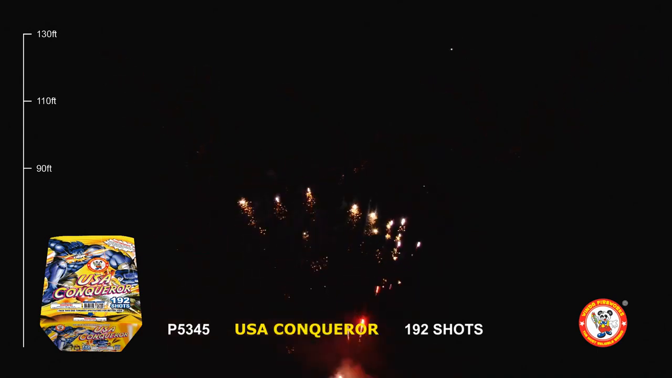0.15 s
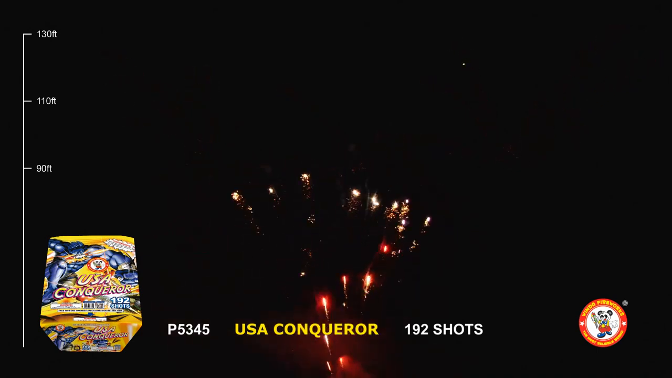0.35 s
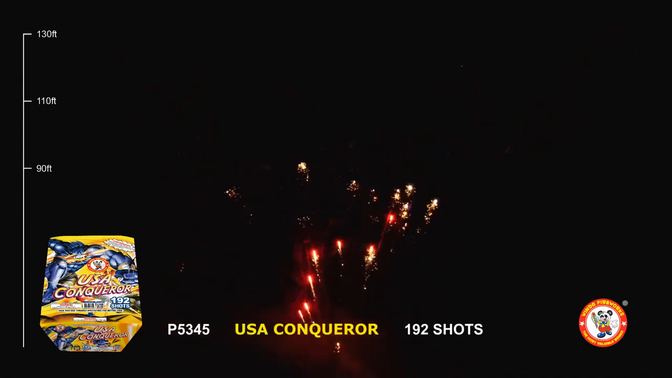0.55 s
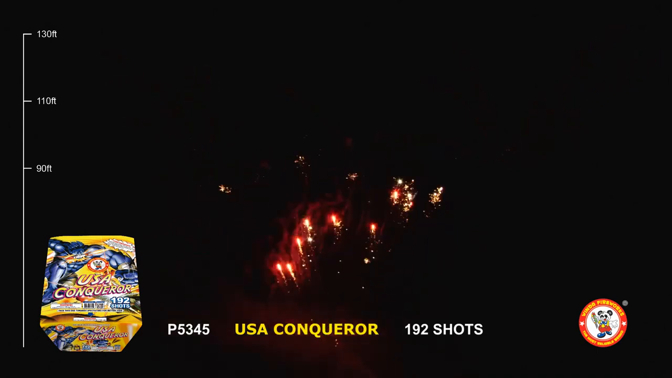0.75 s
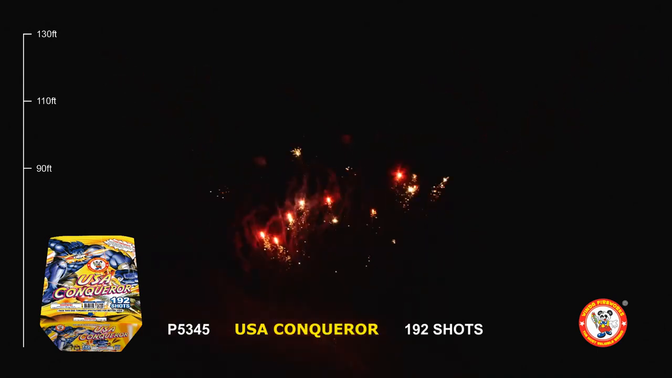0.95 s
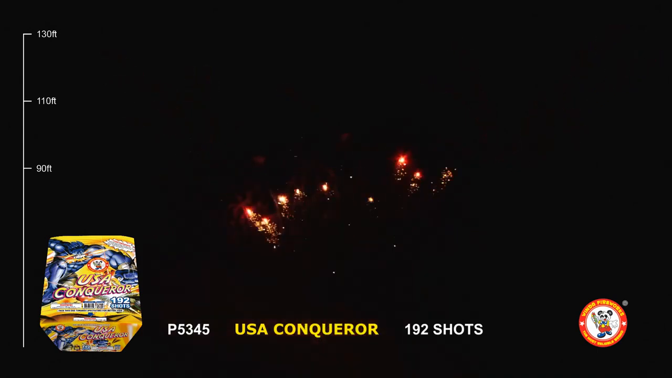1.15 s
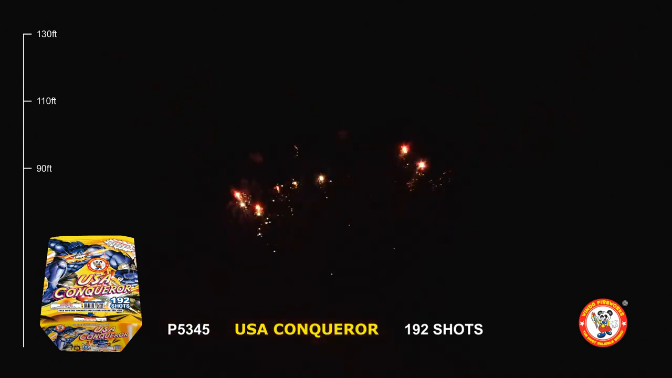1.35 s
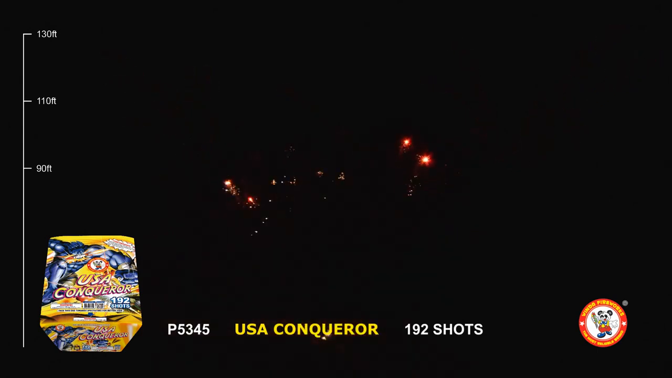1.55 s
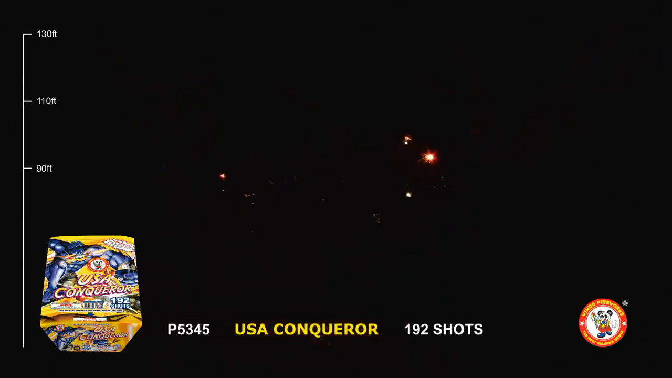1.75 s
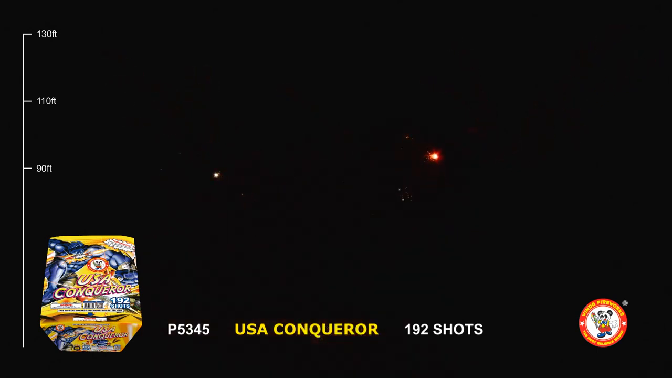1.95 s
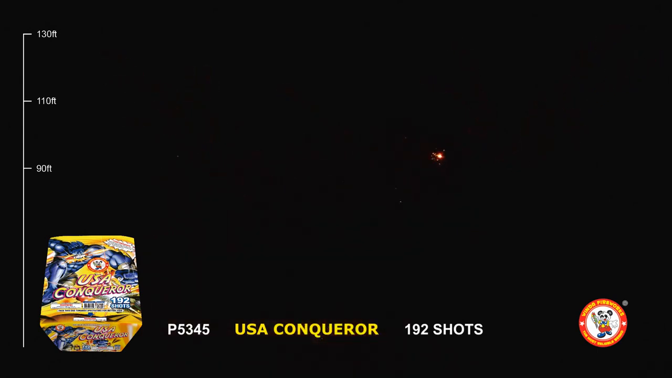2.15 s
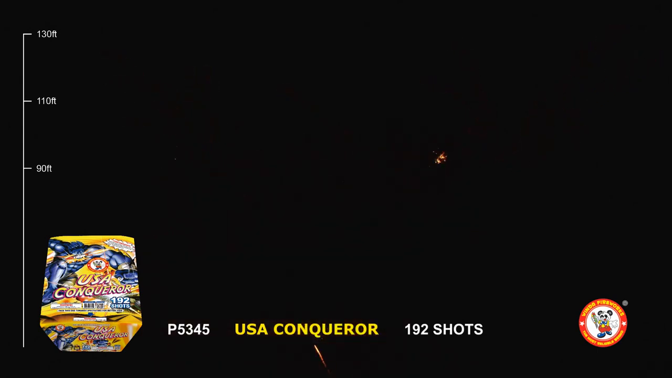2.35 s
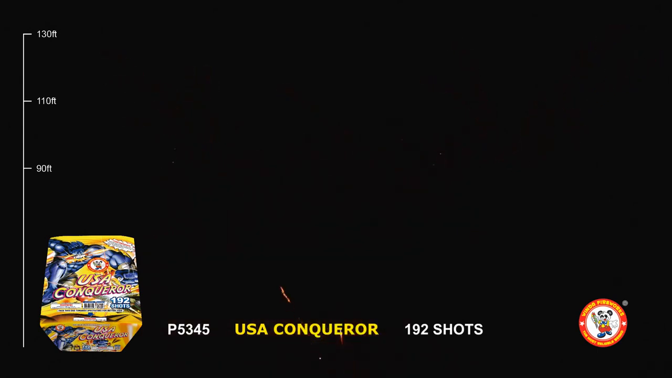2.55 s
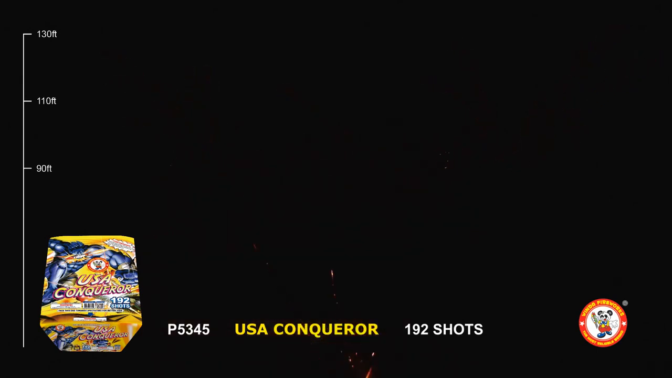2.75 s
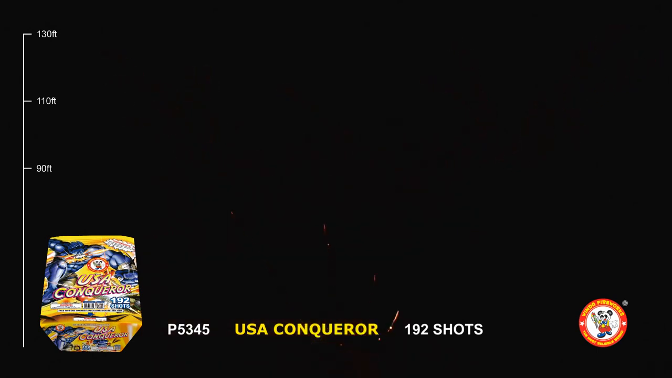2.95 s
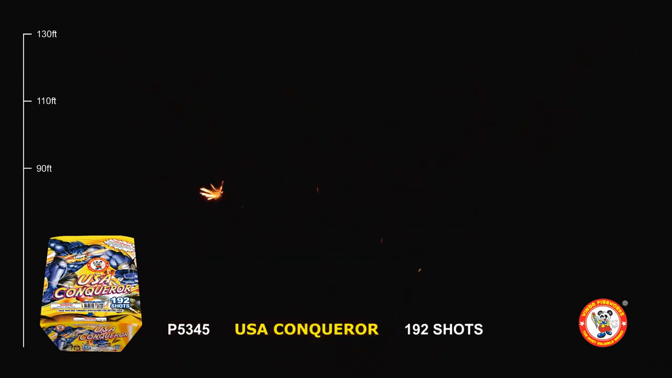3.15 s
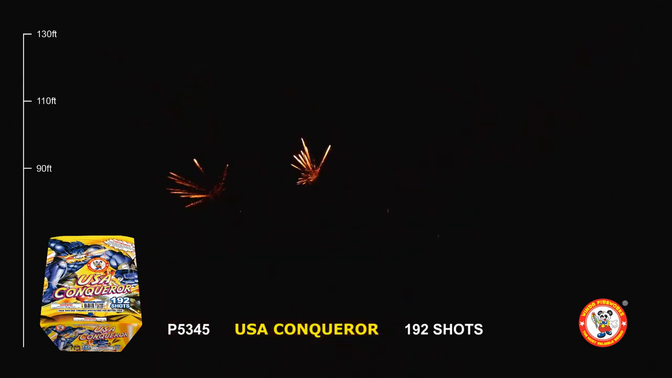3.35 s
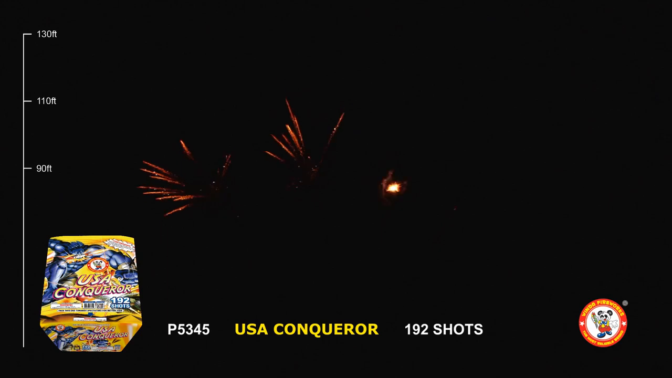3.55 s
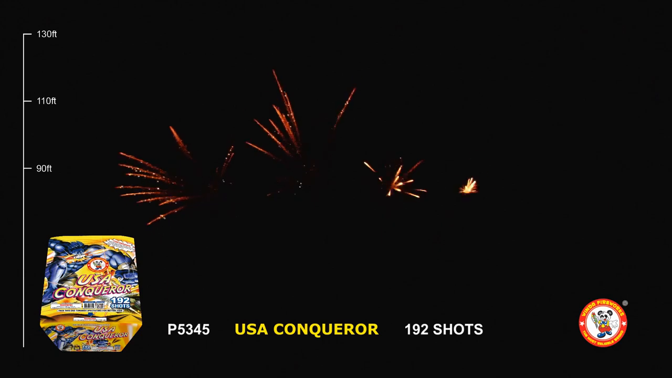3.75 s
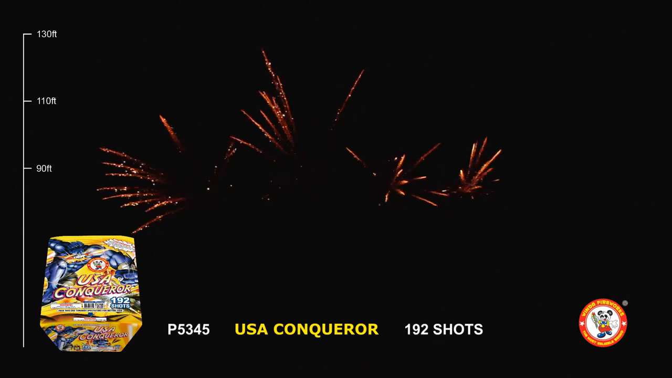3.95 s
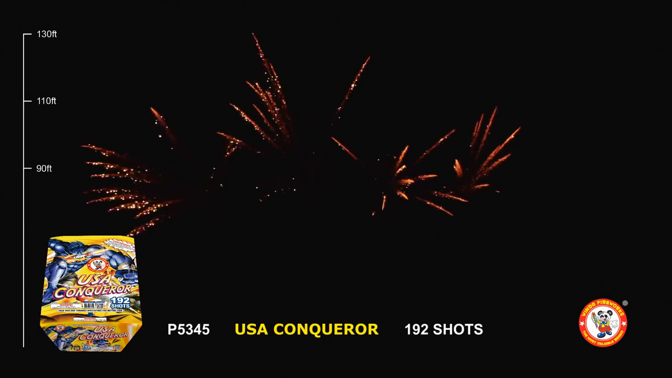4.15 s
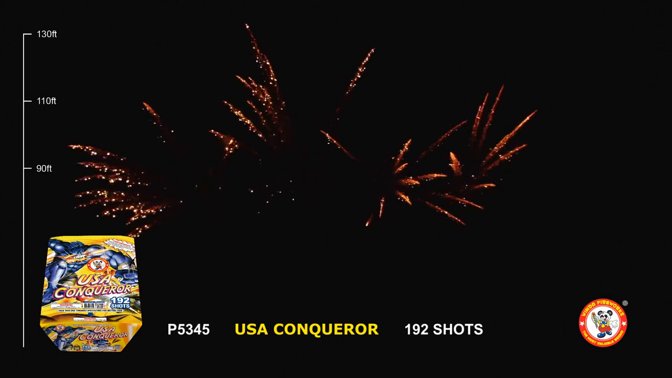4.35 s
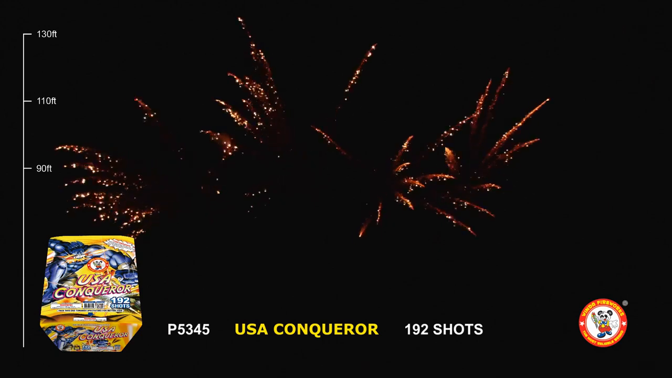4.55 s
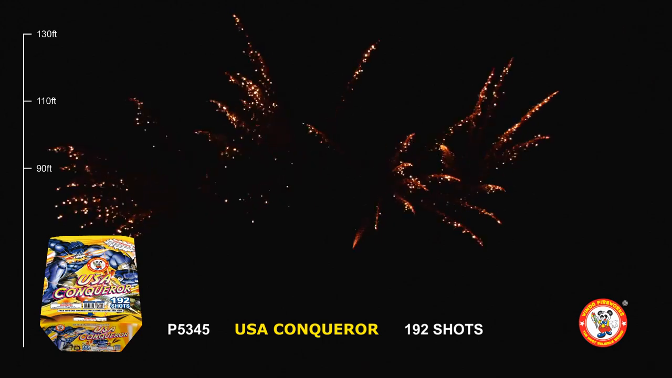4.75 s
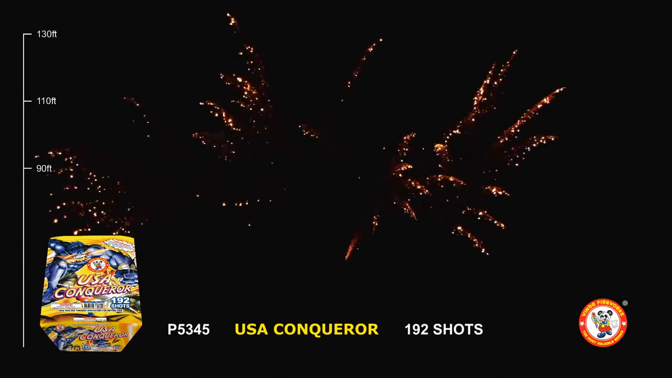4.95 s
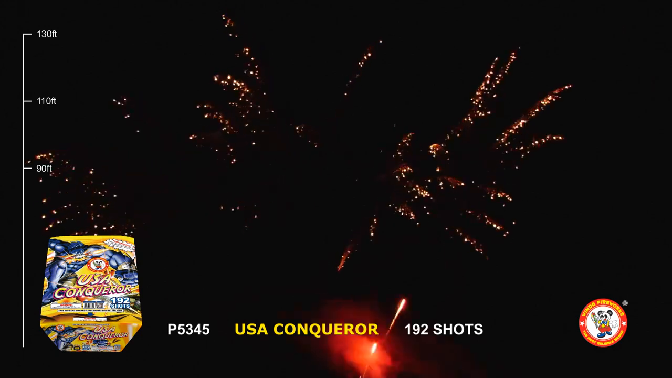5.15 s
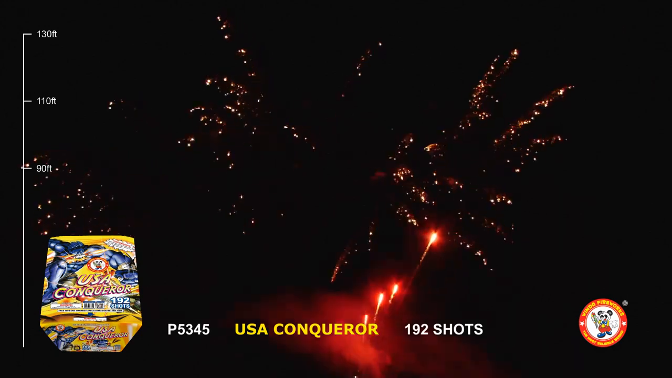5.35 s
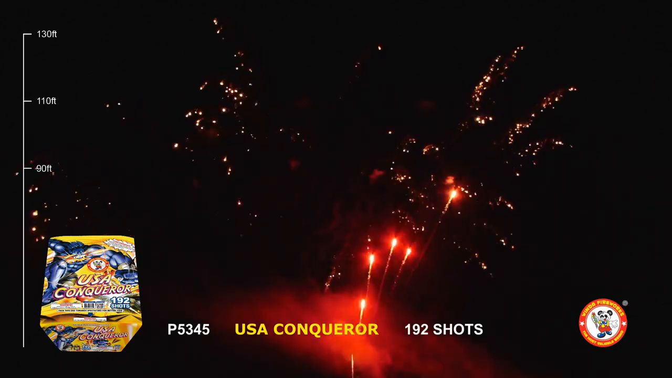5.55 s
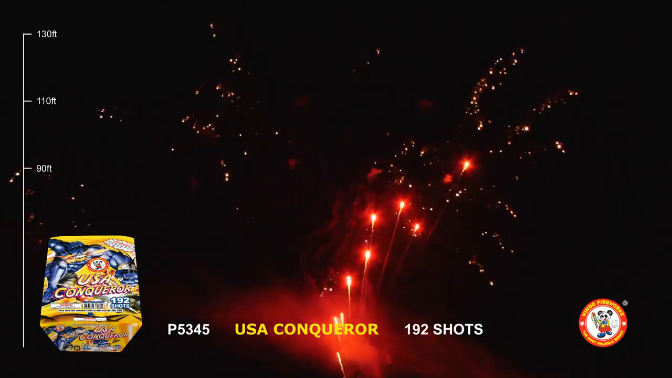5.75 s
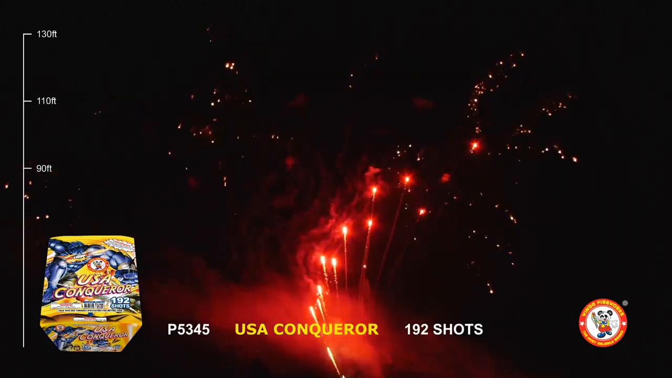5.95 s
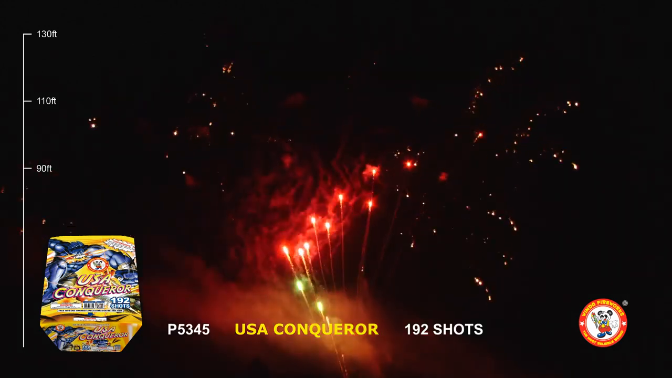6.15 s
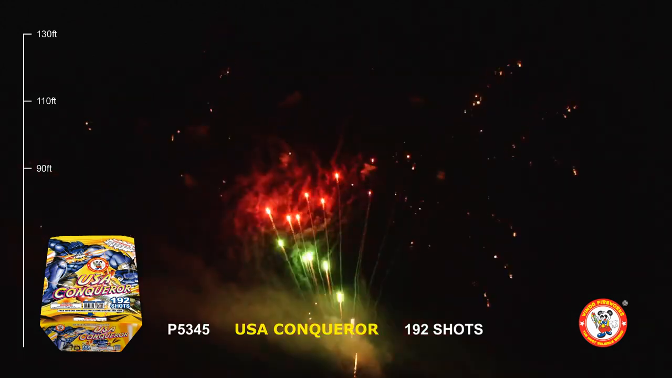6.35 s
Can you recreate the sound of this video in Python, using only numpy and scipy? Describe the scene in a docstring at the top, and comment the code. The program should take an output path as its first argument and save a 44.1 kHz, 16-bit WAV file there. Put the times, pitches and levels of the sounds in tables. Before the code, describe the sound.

A firework cake in an open field at night: rapid soft launch thumps with spits of gas under dense, sharp crackling that burns out after two seconds. Four stronger separate launches follow, then four very loud, short shell booms that overload the microphone, in two pairs. Echoes slap back from a distant wall and roll over the land before a faint glitter hiss and a final quick volley.

```python
"""Quick thumps and spits of gas come first, amid a dense crackle that burns out after about two seconds.
A firework cake fires from its tubes in an open field at night: each shot is a short push of air and a jet
of noise, each star a sharp pulse. Four more shots follow, then four shell bursts (short booms with torn
noise) that overload the microphone, a faint glitter and a last quick volley. A distant wall returns every
shot a fifth of a second later, and the bursts roll away over the land in long tails of noise."""
import sys
import numpy as np
from scipy import signal
from scipy.io import wavfile
from scipy.ndimage import uniform_filter1d

SR = 44100
rng = np.random.default_rng(int(sys.argv[2]) if len(sys.argv) > 2 else 0)


def dump(signal):
    """Clip the signal to [-1, 1] and save it as 16-bit WAV at the path in sys.argv[1]."""
    limited = np.clip(np.atleast_2d(signal).T, -1, 1)
    pcm = np.round(limited * 32767).astype(np.int16)
    wavfile.write(sys.argv[1], SR, pcm)


N = 286209  # samples in the scene
AGE = np.arange(4096) / SR  # seconds since a short sound began

# In all tables of events, the levels are starting points: the functions add their own trims in dB.
# Tube shots, one row each: (t/s, thump level/dB, gas level/dB, jet length/s, gas colour f/Hz, spit level/dB,
# first slap level/dB, second slap level/dB, wall echo against the usual level/dB, bark level/dB, bark f/Hz)
LAUNCHES = [(0.001, -36.5, -23.5, 0.002, 3130, -40, -46, -48, 4, -46, 410),
            (0.09, -33, -23, 0.0015, 1800, -39, -48, -48, 0, -36, 525),
            (0.1624, -34, -22.5, 0.0015, 1800, -49, -54, -54, 0, -39, 567),
            (0.2123, -32.5, -22.5, 0.0016, 7000, -31, -39, -37, -2, -38, 580),
            (0.303, -35, -37, 0.0023, 1790, -44, -51, -51, 1, -51, 716),
            (0.362, -36, -28, 0.002, 1800, -32, -40, -43, 5, -53, 724),
            (0.439, -33.5, -24, 0.0018, 2380, -37, -40, -40, 2, -48, 370),
            (0.511, -32.5, -27, 0.0015, 1800, -30, -36.5, -36.5, 0, -51, 390),
            (0.6134, -30.5, -21, 0.0021, 3220, -29, -28, -34, 2, -52, 400),
            (0.653, -37.5, -29, 0.0016, 2350, -24, -31, -35, 7, -55, 714),
            (0.7214, -32.5, -28, 0.002, 5900, -29, -37, -28, 1.5, -51, 373),
            (2.6208, -25.5, -18.5, 0.0018, 2085, -21.5, -28, -18, 1.5, -35, 449.5),
            (2.778, -26.5, -16.5, 0.0014, 2333, -28, -25, -21, 1.5, -39, 380),
            (2.9343, -23, -15, 0.0043, 1600, -22, -17.5, -37, 1.5, -37, 373),
            (3.0702, -28, -17.5, 0.0008, 5530, -31, -29, -29.5, 1.5, -26, 544),
            (5.3861, -31.5, -13.5, 0.0023, 5130, -32, -32, -39.0, 1.5, -33, 555),
            (5.449, -41, -20, 0.0015, 3380, -38, -29, -48, 5, -51, 660),
            (5.5357, -36, -21.5, 0.0019, 4100, -37.5, -38.5, -49, 1.5, -42, 720),
            (5.5907, -35, -22.5, 0.0027, 1600, -43, -32, -52, 1, -39, 578),
            (5.7358, -35, -24, 0.0025, 6430, -38, -31.5, -50, 1, -48, 610),
            (5.8982, -32.5, -24, 0.0012, 1900, -38.5, -35.5, -50, 2, -48, 568),
            (5.9747, -33.5, -24, 0.0012, 2320, -35.5, -32, -42.0, -1.5, -45, 370),
            (6.0119, -35.5, -22, 0.0033, 5450, -29, -30, -31.5, 4, -53, 370),
            (6.0836, -34.5, -24.5, 0.0029, 3750, -33, -28, -29, -1, -47, 380),
            (6.1417, -33, -31, 0.0019, 1600, -33, -26, -32.0, 0, -49, 460),
            (6.1929, -33, -24.5, 0.003, 1770, -29.5, -29, -26, 0, -48, 460),
            (6.2743, -37.5, -25, 0.0035, 3330, -27.5, -23.5, -24, 1, -55, 720),
            (6.3363, -36, -29, 0.003, 3600, -32, -31, -28.5, 6, -51, 730),
            (6.4135, -34, -27, 0.0029, 1880, -30, -27, -32.0, 0, -55, 494),
            (6.4876, -39, -27, 0.0018, 2350, -31, -36, -34, 3, -37, 373)]
# Ringing of the air in the tube and of the cake's box: (f/Hz, gain, time to fall to 37 percent t/s)
CAKE_MODES = [(460, 0.0022, 0.015), (181, 0.00072, 0.031)]
# Things round the cake that reflect the thump, varied at each shot: (typical delay t/s, typical gain)
NEARBY = [(.0037, -0.062), (.0085, 0.17), (0.0097, 0.26), (0.013, 0.19), (0.0178, 0.19), (.0225, -0.014),
          (0.0263, 0.085)]
# Colour of the push of air: (f/Hz, level/dB)
THUMP = [(20, -26), (60, -10), (105, -4.5), (175, 3.5), (320, -0.5), (480, 0.5), (700, -9), (1200, -7.5),
         (4000, -56)]
# Colour of the low rumble after it: (f/Hz, level/dB)
RUMBLE = [(20, -25), (60, -13), (100, 4), (150, -2), (210, 7.5), (320, -6.5), (600, -14), (2000, -50)]


def thumps(nearby_edge_hz=420, nearby_gain=1.0, thump_db=-1.0, bark_trim_db=-2, rumble_db=-10):
    """The lift charge pushes air out of a tube that barks; the cake rings, nearby things answer in the bass."""
    ring = sum(gain * np.cos(2 * np.pi * hz * AGE) * np.exp(-AGE / decay) for hz, gain, decay in CAKE_MODES)
    push = unit(colour(signal.unit_impulse(len(AGE)) + ring, THUMP))
    out = np.zeros(N)
    for s, db, *_, bark_db, tube_hz in LAUNCHES:
        shot = push.copy()
        for delay, gain in NEARBY:
            varied_delay = delay * rng.uniform(0.88, 1.12)
            varied_gain = nearby_gain * gain * rng.normal(1, 0.25)
            add(shot, varied_delay, varied_gain * dull(push, nearby_edge_hz))
        add(out, s, sized(shot, db + thump_db, 0.013))
        bark = np.sin(2 * np.pi * tube_hz * AGE) * np.exp(-AGE / 0.0056)
        add(out, s, sized(bark, bark_db + bark_trim_db, 0.013))
        rumble = colour(puff(0.0068, 0.037), RUMBLE)
        add(out, s, sized(rumble, db + rumble_db, 0.023))
    return out


# Colour of the gas: (f/Hz, level/dB)
GAS = [(200, -45.5), (700, -4), (1400, -4.5), (2000, -5.5), (2900, -0.5), (3500, -4.5), (4300, 5.5),
       (4900, -2), (5600, 1), (7000, 0), (9000, -11), (11500, -11), (13000, -32), (15500, -50)]
# Delays of the two slaps from hard things near the cake: (first t/s, second t/s)
SLAP_S = (.011, .021)
# Faces of the distant wall, used again by wall_echoes: (delay t/s, level/dB)
WALL_FACES = [(0.2096, -1.5), (0.222, -6), (0.244, -10.5), (0.2535, -13)]


def gas(jet_db=1, spit_db=0, slap_db=-1, slap_length=0.0018, mirror_db=-10, front_db=-6, colour_strength=1.6):
    """A shock and a jet at each muzzle, then spitting sparks; near things slap back, the wall mirrors the jet."""
    out = np.zeros(N)
    for s, _, jet, length, gas_hz, spit, first, second, wall_db, *_ in LAUNCHES:
        rush = amp(front_db) * shock() + gust(length) + amp(-7.5) * puff(0.0013, 0.0051, grain_db=4.5)
        blow = sized(resonate(rush, gas_hz, colour_strength, sharpness=2.7), jet + jet_db, 0.0021)
        add(out, s, blow)
        fizz = tint(spitting(), 2040, 6600, strength=1.3, sharpness=16)
        add(out, s + 0.0056, sized(fizz, spit + spit_db, 0.01))
        for delay, db in zip(SLAP_S, (first, second)):
            slap = tint(gust(slap_length), 2040, 5450, strength=1.1)
            add(out, s + delay, sized(slap, db + slap_db, 0.0048))
        for delay, face_db in WALL_FACES:
            mirrored = dull(blow, 3560, order=2)
            add(out, s + delay, amp(mirror_db + face_db + wall_db) * mirrored)
    return colour(out, GAS)


def spitting(sparks_db=-2, count=4):
    """The fizz behind a rising shell: a swell of noise with a few distinct sparks in it."""
    fizz = puff(0.0017, 0.015, grain_db=4.5)
    for delay, size in zip(rng.uniform(0.0017, .024, count), rng.uniform(0.1, 1, count)):
        spark = size * np.exp(-delay / 0.012) * puff(.0001, 0.0014)
        add(fizz, delay, amp(sparks_db) * spark)
    return fizz


# The loudest stars: (t/s, level/dB, how long the star goes on breaking up t/s, colour f/Hz)
CRACKS = [(0.0318, -25, 0.012, 1650), (0.0638, -33, 0.0013, 2500), (0.0989, -21.5, 0.00055, 2050),
          (0.137, -27.5, 0.0017, 895), (0.152, -25, 0.0023, 4090), (0.169, -26, 0.0, 5790),
          (0.217, -27, 0.01, 7500), (0.247, -25.5, 0.0, 886), (0.291, -32, 0.0, 5000),
          (0.36, -22.5, 0.01, 2160), (0.3878, -29, 0.0047, 3000), (0.394, -24, 0.0, 7450),
          (0.399, -27, 0.0057, 2000), (0.408, -22.5, 0.0021, 895), (0.4222, -27, 0, 1598),
          (0.4597, -29, 0.0015, 4430), (0.471, -26, 0.0012, 7610), (0.4923, -21, 0, 1130),
          (0.5213, -26, 0.0, 2400), (0.527, -25, 0.00014, 7500), (0.5346, -25.5, 0.00057, 5000),
          (0.5415, -28, 0.004, 1960), (0.5687, -30, 0.0, 3000), (0.5761, -23.5, 0.00015, 7500),
          (0.598, -27, 0.0049, 1508), (0.607, -28, 0.02, 1900), (0.627, -28, 0.0, 2400),
          (0.6475, -24, 0.0, 1178), (0.6674, -25.5, 0.0021, 2335), (0.7161, -27, 0.0, 2393),
          (0.734, -22, 0.0017, 5080), (0.7409, -28, 0.0, 1499), (0.7494, -19.5, 0.0, 900),
          (0.7628, -21.5, 0.00076, 895), (0.826, -23.5, 0.0, 1400), (0.8488, -24.5, 0.0011, 7540),
          (0.858, -24.5, 0.0025, 899), (0.8687, -27, 0.0, 2598), (0.9089, -20.5, 0.0044, 977),
          (0.9373, -30, 0.0038, 2310), (0.9834, -27.5, 0.0055, 888), (1.001, -29.5, 0.0, 2870),
          (1.0148, -28, 0.00043, 6040), (1.0261, -27.5, 0.0014, 1388), (1.0479, -27, 0.0034, 1014),
          (1.0849, -20.5, 0.0019, 1390), (1.0961, -25, 0.0031, 956), (1.107, -25, 0.0057, 4683),
          (1.1171, -30, 0.00038, 5030), (1.1237, -30, 0.0, 2398), (1.133, -22.5, 0.00093, 910),
          (1.1478, -27, 0.0034, 6000), (1.1571, -27.5, 0.0016, 4306), (1.2108, -26, 0.0, 2082),
          (1.2227, -30, 0.0, 5290), (1.239, -24.5, 0.013, 4410), (1.26, -33, 0.0, 5520),
          (1.2877, -23, 0.0, 2448), (1.314, -21.5, 0, 1071), (1.3241, -29, 0.0, 903),
          (1.3345, -29, 0.00067, 916), (1.3591, -26, 0.00027, 2225), (1.3667, -25, 0.0, 7450),
          (1.373, -27.5, 0, 920), (1.4208, -27.5, 0.006, 1444), (1.446, -25.5, 0, 2744),
          (1.461, -28.5, 0.0033, 2497), (1.4917, -26.0, 0.0052, 3130), (1.514, -24.5, 0.0033, 1330),
          (1.5336, -23, 0.0016, 7530), (1.56, -22.5, 0.0086, 2438), (1.5789, -25, 0.003, 2460),
          (1.616, -23.5, 0.00034, 1219), (1.6231, -24, 0.0, 2600), (1.6309, -23, 0.0017, 3430),
          (1.681, -22.5, 0.0046, 907), (1.7083, -23, 0.002, 1646), (1.7232, -21, 0.002, 7430),
          (1.7427, -17.5, 0.016, 4470), (1.7533, -24.5, 0.00081, 2490), (1.7836, -25, 0.002, 2230),
          (1.7943, -22.5, 0.0046, 904.5), (1.827, -24.5, 0.0, 979), (1.8324, -26, 0.0016, 6020),
          (1.8381, -25, 0.0, 2500), (1.8553, -22, 0.0026, 1219), (1.8663, -25, 0.0, 2997),
          (1.8984, -32, 0.0, 2100), (1.9266, -23, 0.0067, 3017), (1.941, -29, 0, 2637),
          (1.9557, -25.5, 0.00067, 4238), (1.994, -34.5, 0.0011, 7530), (2.0295, -29, 0.014, 1498),
          (2.0694, -24.5, 0.0015, 3450), (2.13, -21, 0.0, 7520), (2.1666, -25.5, 0.00057, 1217),
          (2.186, -26, 0.015, 7450), (2.226, -25.5, 0.02, 980.6), (2.3013, -26.5, 0, 1575),
          (2.375, -35.0, 0.003, 898), (2.4082, -25, 0.0, 4460), (2.437, -35.5, 0.0088, 6580),
          (2.5, -34, 0.0063, 7480), (2.6, -31.5, 0.0044, 7470), (2.738, -28, 0.0088, 3277),
          (2.8977, -31, 0, 1540), (3.063, -24.5, 0.00054, 1624)]
# The cloud of other stars, near and far: (stars a second, base level/dB, spread of level/dB)
CLOUD = [(64.12, -30, 1.4), (90.1, -38, 3)]
CLOUD_END_S, CLOUD_FADE_DB_PER_S = 1.93, 132  # the cloud crackles evenly, then burns out
# Moments when the cloud is quieter: (from t/s, to t/s)
LULLS = [(.672, .712), (1.642, 1.68)]
LULL_DB = -10
# Colour of the snaps, used again by bursts: (f/Hz, level/dB)
SNAP = [(40, -43), (170, -30), (420, -4), (800, -4.5), (1400, -1), (2400, 1), (4300, -0.5), (7000, 2),
        (8300, -2), (9500, -10), (11500, -6), (14500, -33)]


def crackle(loud_db=0.5):
    """Crackling stars break with sharp snaps: loud ones over a cloud of smaller ones that burns out."""
    out = np.zeros(N)
    for s, db, length, hz in CRACKS:
        add(out, s, star(db + loud_db, length, hz))
    for per_s, db, spread_db in CLOUD:
        for k in range(round((CLOUD_END_S + .5) * per_s)):
            s = (k + rng.random()) / per_s
            fade_db = -CLOUD_FADE_DB_PER_S * max(s - CLOUD_END_S, 0)
            lull_db = LULL_DB * any(a < s < b for a, b in LULLS)
            level = db + fade_db + lull_db + spread_db * rng.uniform(-0.16, 2.7)
            add(out, s, star(level, 0, 3000 * 2 ** rng.uniform(-1.93, 1.62)))
    return colour(out, SNAP)


PIECE_GAP_S, PIECE_DB = .006, -6  # typical gap between pieces of a star; typical offset from its level


def star(db, length, hz, piece_spread_db=2):
    """A first snap, then a quick run of mostly weaker ones for as long as the star breaks up."""
    out = sized(snap(hz), db, 0.0031)
    for k in range(round(length / PIECE_GAP_S)):
        piece = snap(hz * 2 ** rng.normal(0, 0.84))
        piece = sized(piece, db + PIECE_DB + piece_spread_db * rng.normal(), 0.0048)
        add(out, (k + rng.uniform(.5, 1.5)) * PIECE_GAP_S, piece)
    return out


def snap(hz, ground=0.64):
    """One snap: a shock with its own colour, and its bounce off the ground some 3 ms later."""
    out = shock()
    add(out, rng.uniform(0.0022, 0.0036), ground * rng.uniform(0.25, 1.75) * out)
    return resonate(dull(out, 9000 * 2 ** rng.normal(0, .5)), hz, strength=1.2, sharpness=3)


# Shell bursts: (t/s, level/dB, boom f/Hz, bark f/Hz, bark against the boom level/dB, length t/s, crack f/Hz,
# wall echo level/dB, colour of the echoes f/Hz, tree line echo level/dB)
BURSTS = [(3.5134, 4.509, 494, 792, -10, 0.0057, 1870, -10, 556, -35.5),
          (3.6451, 5, 448, 907, -6, 0.0066, 2050, -9, 945, -26.5),
          (3.9709, 4, 412, 803, 3.5, 0.0073, 1200, -8.5, 980, -29),
          (4.1382, 4.5, 440, 924, 0.5, 0.0074, 2350, -9, 846, -29.5)]
# Colour of the blast: (f/Hz, level/dB)
BLAST = [(25, -26), (100, -10), (170, -14), (250, 1.5), (350, 0), (480, 4.5), (620, 5), (1050, 3.5),
         (1500, -4), (2100, -2.5), (4300, -5.5), (7000, -12.5), (10000, -21.5), (15000, -61)]


def bursts(rag_db=0.0, debris_db=-15.5, boom_db=1.1, crack_db=-8.0, ground_db=-14,
           bark_glide=0.33, boom_glide=0.21):
    """A boom of about three quickening cycles, a falling bark, torn noise, ground scatter and rattling pieces."""
    out = np.zeros(N)
    for s, db, hz, bark_hz, bark_db, length, crack_hz, *_ in BURSTS:
        hold = np.exp(-(AGE / length) ** 4)  # stays up, then drops quickly
        left = 1 - AGE / length
        low = np.sin(2 * np.pi * hz * AGE * (1 - boom_glide * left / 2))
        bark = np.sin(2 * np.pi * bark_hz * AGE * (1 + bark_glide * left / 2))
        cycles = low + amp(bark_db) * bark
        boom = -unit(low_cut(cycles * hold, 180, order=2))
        torn = resonate(rng.standard_normal(len(AGE)) * hold, crack_hz, strength=6.7, sharpness=4.2)
        crack = unit(colour(torn, SNAP))
        blast = unit(colour(rng.standard_normal(len(AGE)) * hold, BLAST))
        ground = unit(low_cut(colour(puff(0.01, 0.009), BLAST), 290))
        debris = colour(unit(rattle() + puff(0.003, 0.028, grain_db=2.0)), SNAP)
        parts = amp(boom_db) * boom + amp(crack_db) * crack + amp(rag_db) * blast
        parts = parts + amp(ground_db) * ground + amp(debris_db) * debris
        add(out, s, sized(parts, db, 0.0046))
    return out


def rattle(per_s=700, decay=0.046, spread_db=4):
    """Flying pieces: separate ticks of uneven size that fade away."""
    chosen = rng.random(len(AGE)) < per_s / SR
    ticks = chosen * rng.choice([-1, 1], len(AGE)) * amp(spread_db * rng.standard_normal(len(AGE)))
    return unit(ticks * (1 - np.exp(-AGE / 0.0037)) * np.exp(-AGE / decay))


def shock_fronts():
    """The bare shock that each burst sends out over the land, a single filtered pulse."""
    out = np.zeros(N)
    for s, db, *_ in BURSTS:
        add(out, s, sized(np.ones(1), db, 0.0043))
    return low_cut(colour(out, BLAST), 223, order=2)


# Colour of the echoes from the wall: (f/Hz, level/dB)
WALL = [(100, -10.5), (300, -7), (600, -14), (1000, -1.5), (1400, -1), (2000, -1), (3000, -4), (5000, -9),
        (8000, -16.5), (11000, -44), (15000, -56)]


def wall_echoes(echo_db=-5.5, smear_db=2.0, slap_db=-0.5, growth=1.23, usual_db=-32):
    """Each wall face returns a launch as a slap in a short rasp with little bass; hard thumps gain extra."""
    out = np.zeros(N)
    for s, db, *_, wall_db, _, _ in LAUNCHES:
        for delay, face_db in WALL_FACES:
            rasp = puff(0.00037, 0.0025, grain_db=4) + amp(smear_db) * puff(0.0019, 0.016, grain_db=5)
            rasp = unit(tint(rasp, 1250, 2190, strength=1.0, sharpness=7.5))
            echo = rasp + amp(slap_db) * gust(0.0022)
            level = usual_db + growth * (db - usual_db) + face_db + wall_db + echo_db
            add(out, s + delay, sized(echo, level, 0.019))
    return colour(out, WALL)


# Time to the echoes of each burst, in the order of BURSTS: (by the wall t/s, by the tree line t/s)
ECHO_DELAYS = [(.2153, 1.234), (.2077, 1.264), (.2011, 1.225), (.1902, 1.197)]
# Parts of the wall's echo: (lag behind the main part t/s, level/dB, treble edge f/Hz, spread t/s)
WALL_PARTS = [(0, -1.5, 2160, 0.0045), (.024, -14, 3500, 0.0059)]
# Parts of the tree line's echo: (lag behind the main part t/s, level/dB, treble edge f/Hz, spread t/s)
TREE_PARTS = [(-.007, -6, 1300, 0.00322), (0, -0.5, 1370, 0.00503), (.011, -9, 1400, 0.005)]
# Single returns of the bursts from other things in the field: (t/s, level/dB, treble edge f/Hz)
STRAY_ECHOES = [(3.764, -26, 5000), (3.777, -28.5, 1500), (3.895, -35, 7000), (3.923, -30, 3000),
                (4.02, -29, 3000), (4.087, -28.5, 4000), (4.105, -28, 1980), (4.228, -25.5, 5000),
                (4.389, -28, 7000), (4.4, -28, 6960), (4.418, -26.5, 2500), (4.465, -33, 2500),
                (4.578, -31.5, 6850), (4.655, -37.5, 1500), (4.812, -35.5, 1500), (4.821, -32.5, 1500),
                (5.046, -36.5, 1500), (5.127, -38.5, 3000), (5.143, -37, 1490)]
# Colour of all these returns: (f/Hz, level/dB)
RETURN = [(40, -31), (150, -5.5), (300, -4), (480, 7.5), (700, -0.5), (950, 4), (1500, -6.5), (2000, -1.5),
          (2700, -3.5), (4300, -7.5), (7000, -16.5), (12000, -34), (15000, -61)]


def burst_echoes(echo_db=1, stray_hz=800, faint_db=-36, faint_fade_db_per_s=11,
                 stray_spread_s=0.00344, core_db=0, count=22):
    """Bursts return smeared from the wall, then duller from the trees; stray and faint returns mutter between."""
    out = np.zeros(N)
    strong = [(*row, stray_spread_s, stray_hz) for row in STRAY_ECHOES]
    for (s, *_, wall_db, hz, trees_db), (wall_s, trees_s) in zip(BURSTS, ECHO_DELAYS):
        for delay, level, parts in (wall_s, wall_db, WALL_PARTS), (trees_s, trees_db, TREE_PARTS):
            for lag, db, edge_hz, spread in parts:
                strong.append((s + delay + lag, level + db, edge_hz, spread, hz))
    first, last = min(strong)[0], max(strong)[0]
    faint = []
    for s in rng.uniform(first, last, count):
        level = faint_db - faint_fade_db_per_s * (s - first) + rng.normal(0, 2.8)
        faint.append((s, level, 2500, .003, stray_hz))
    for s, db, edge_hz, spread, hz in strong + faint:
        smear = puff(spread / 2, spread * 1.83, grain_db=4)
        add(smear, 0.7 * spread, amp(core_db) * shock())  # the main face answers all at once
        echo = colour(resonate(smear, hz, strength=0.47, sharpness=2.3), RETURN)
        echo = low_cut(dull(echo, edge_hz), edge_hz / 6)  # small reflectors return little bass
        echo = dull(echo, 4 * edge_hz, order=2)  # the air soaks up the highest treble
        add(out, s - .001, sized(echo, db + echo_db, 0.0069))
    return out


# How fast the near scatter dies: (f/Hz, time to fall by 60 dB t/s)
NEAR_T60 = [(100, 0.26), (1000, 0.34), (4000, 0.32), (12000, 0.3)]


def near_scatter(stars, lift, jets, fronts):
    """Small things near the cake scatter each sound into a short tail."""
    sent = amp(-12.5) * stars + amp(-10.5) * lift + amp(-12.5) * jets + amp(-13.5) * fronts
    return scatter(sent, NEAR_T60, apart=0.32, patchy_db=2.0)


# How fast launches and stars die over the field: (f/Hz, time to fall by 60 dB t/s)
FIELD_T60 = [(100, 7.5), (500, 4.5), (1200, 4.58), (3000, 2.56), (6000, 1.88), (12000, 2.1)]
# How fast the long roll of the bursts dies: (f/Hz, time to fall by 60 dB t/s)
ROLL_T60 = [(100, 4.2), (500, 9.5), (1200, 5.76), (3000, 3.32), (6000, 3.1), (12000, 2.24)]
# Colour given by the land: (f/Hz, level/dB)
LAND = [(30, -22), (150, -8), (450, -5), (900, -1.5), (2000, 6), (3000, 7), (4500, 4), (8000, 4.5),
        (14000, 2)]


def long_roll(stars, lift, jets, fronts):
    """Every sound rolls away over the land, in a tail that is stronger on the right."""
    sent = amp(-23.0) * stars + amp(-19.5) * lift + amp(-24.0) * jets
    roll = scatter(sent, FIELD_T60, apart=0.52, patchy_db=3.5)
    roll += scatter(amp(-23.0) * fronts, ROLL_T60, apart=0.66, patchy_db=1.0)
    return colour(roll, LAND, keep_energy=False) * amp([[-1.5], [1.5]])


def scatter(x, t60, apart=.45, patchy_db=2):
    """Many small reflections in uneven clumps; each band dies at its own speed, partly alike on both sides."""
    shared, *own = rng.standard_normal((3, 3 * SR))
    hz, t, z = signal.stft(shared + apart * np.array(own), SR, nperseg=256)
    clumps = uniform_filter1d(rng.standard_normal(z.shape[1:]), size=5, axis=1)
    clumps = uniform_filter1d(clumps, size=16, axis=0)
    tail_db = -60 * t / read(t60, hz)[:, None] + patchy_db * clumps / clumps.std()
    tail = signal.istft(z * amp(tail_db), SR, nperseg=256)[1]
    tail *= 1 - np.exp(-np.arange(tail.shape[1]) / SR / 0.0021)  # soft start
    return signal.fftconvolve(x[None], unit(tail), axes=1)[:, :N]


# When the glitter sounds: (first heard t/s, strongest t/s, gone t/s)
GLITTER_S = (4.92, 5.49, 6.7)
# Colour of the glitter: (f/Hz, level/dB)
GLITTER = [(1000, -28), (4000, 8), (7000, -2), (9500, -4.5), (12000, -9), (14000, -40)]


def glitter(glitter_db=-53):
    """Sparks of the opened shells: a faint grainy hiss that swells and dies."""
    seconds = np.arange(N) / SR
    swell = np.interp(seconds, GLITTER_S, [0, 1, 0])
    grainy = rng.standard_normal((2, N)) * amp(1.8 * rng.standard_normal(N))
    return amp(glitter_db) * swell * colour(grainy, GLITTER)


# Colour of the night air: (f/Hz, level/dB)
AIR = [(20, -10), (100, 9), (400, 8), (1400, 7), (3000, -21), (7000, -24), (10000, -32), (14000, -65)]


def night_air(air_db=-60):
    """The steady quiet noise of the night, separate on each side."""
    return amp(air_db) * colour(rng.standard_normal((2, N)), AIR)


def shock(scatter_db=-8, splinter=0.36):
    """A bare pressure pulse with a splinter behind it and a little scatter from the grass."""
    out = signal.unit_impulse(len(AGE))
    add(out, rng.uniform(.0001, .0007), splinter * rng.standard_normal(1))  # each one breaks in its own way
    return unit(out + amp(scatter_db) * puff(0.00022, 0.0049))


def puff(rise, decay, grain_db=0):
    """A short swell of noise, lumpy by grain_db, that dies right away to silence."""
    noise = rng.standard_normal(len(AGE)) * amp(grain_db * rng.standard_normal(len(AGE)))
    swell = (1 - np.exp(-AGE / rise)) * np.exp(-AGE / decay)
    return unit(noise * swell * (1 - (AGE / AGE[-1]) ** 2))


def gust(length, edge=1.12):
    """A compact bell-shaped burst of noise, mostly within the given time."""
    return unit(rng.standard_normal(len(AGE)) * np.exp(-(edge * (2 * AGE / length - 1)) ** 2 / 2))


def tint(x, low_hz, high_hz, strength=0.82, sharpness=7, count=3):
    """Gives one sound a colour of its own: a few resonances at random pitches."""
    pitches = low_hz * (high_hz / low_hz) ** rng.random(count)
    return x + strength * sum(signal.lfilter(*signal.iirpeak(hz, sharpness, fs=SR), x) for hz in pitches)


def resonate(x, hz, strength, sharpness):
    """Lifts one band of a sound."""
    return x + strength * signal.lfilter(*signal.iirpeak(min(hz, .45 * SR), sharpness, fs=SR), x)


def colour(x, points, keep_energy=True, size=8192):
    """Filter with the given spectrum that never answers early, so that attacks stay sharp."""
    log_gain = np.log(amp(read(points, abs(np.fft.fftfreq(size, 1 / SR)))))
    taps = np.fft.ifft(np.exp(np.conj(signal.hilbert(log_gain)))).real[:size // 2]
    taps = unit(taps) if keep_energy else taps
    return signal.oaconvolve(x, taps.reshape((1,) * (x.ndim - 1) + (-1,)), axes=-1)[..., :x.shape[-1]]


def dull(x, edge_hz, order=1):
    """Gentle loss of treble."""
    return signal.lfilter(*signal.butter(order, min(edge_hz, .45 * SR), fs=SR), x)


def low_cut(x, hz, order=1):
    """Gentle loss of bass."""
    return signal.lfilter(*signal.butter(order, hz, "high", fs=SR), x)


def amp(db):
    """Decibels to gain."""
    return 10 ** (np.asarray(db) / 20)


def read(points, hz):
    """Reads a table between its points, on a log-frequency axis."""
    f, value = np.transpose(points)
    return np.interp(np.log(hz + 1), np.log(f + 1), value)


def unit(x):
    """Scales to an energy of one."""
    return x / np.sqrt(np.sum(x ** 2, axis=-1, keepdims=True) + 1e-20)


def sized(x, db, seconds):
    """Scales a short sound so that its energy, spread over the given time, has the level db."""
    return unit(x) * amp(db) * np.sqrt(seconds * SR)


def add(mix, s, sound):
    """Mixes a sound in at time s."""
    part = mix[max(round(s * SR), 0):][:len(sound)]
    part += sound[:len(part)]


def place(x, left_db, width_db):
    """Sets a source between the channels; above the bass, the first reflections differ on each side."""
    side = amp(width_db) * low_cut(signal.oaconvolve(x, puff(0.00056, 0.00099))[:N], 520, order=2)
    return np.array([amp(left_db / 2) * (x + side), amp(-left_db / 2) * (x - side)])


def scene():
    """Cake, stars and shells, with the field around them."""
    stars, lift, jets, fronts = crackle(), thumps(), gas(), shock_fronts()
    direct = place(stars, left_db=-0.5, width_db=-13.0)
    direct += place(lift, left_db=0.5, width_db=-17)
    direct += place(jets, left_db=-0.8, width_db=-17.5)
    direct += place(wall_echoes(), left_db=-2.5, width_db=-8.0)
    direct += place(bursts(), left_db=-0.7, width_db=-9.5)
    direct += place(burst_echoes(), left_db=-3.0, width_db=-5.5)
    near = near_scatter(stars, lift, jets, fronts)
    roll = long_roll(stars, lift, jets, fronts)
    return direct + near + roll + night_air() + glitter()


# Colour of the microphone: (f/Hz, level/dB)
MICROPHONE = [(20, 0), (2900, -0.5), (3200, 0.5), (3450, -7.5), (3800, -4.5), (4300, 0), (5000, -4.5),
              (5700, -1), (16000, -6.5)]


def record(dry, ceiling=0.87, knee=4, edge_hz=15700):
    """Microphone colour, overload that rounds off loud peaks, a low cut and the band limit."""
    x = colour(dry, MICROPHONE, keep_energy=False)
    x = x / (1 + abs(x / ceiling) ** knee) ** (1 / knee)
    x = dull(low_cut(x, 82.0), 15300, order=2)
    band_limit = signal.firwin(255, edge_hz, window=("kaiser", 8), fs=SR)
    return signal.oaconvolve(x, band_limit[None], "same", axes=1)


dry = scene()
out = record(dry)
dump(out)
```